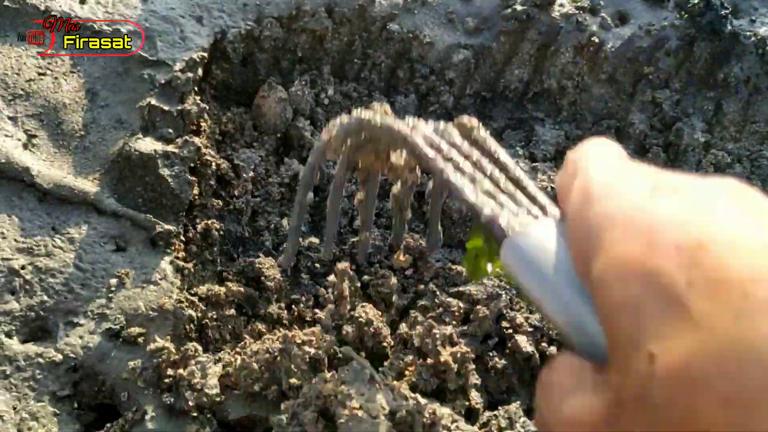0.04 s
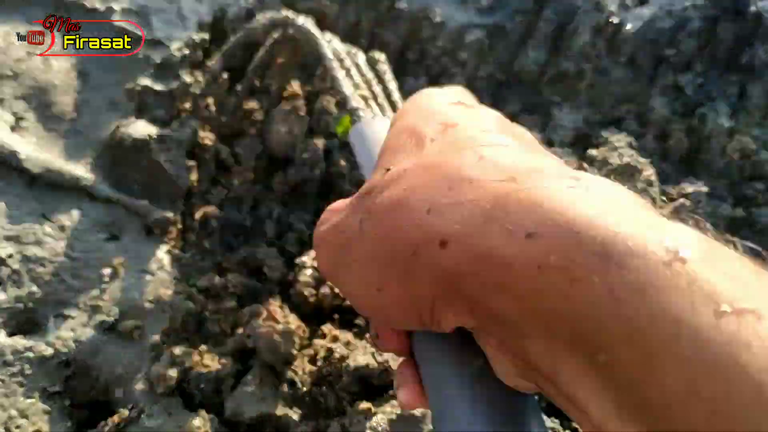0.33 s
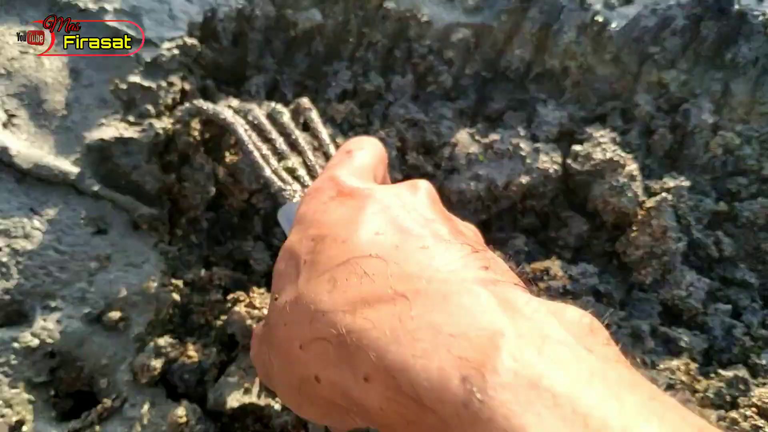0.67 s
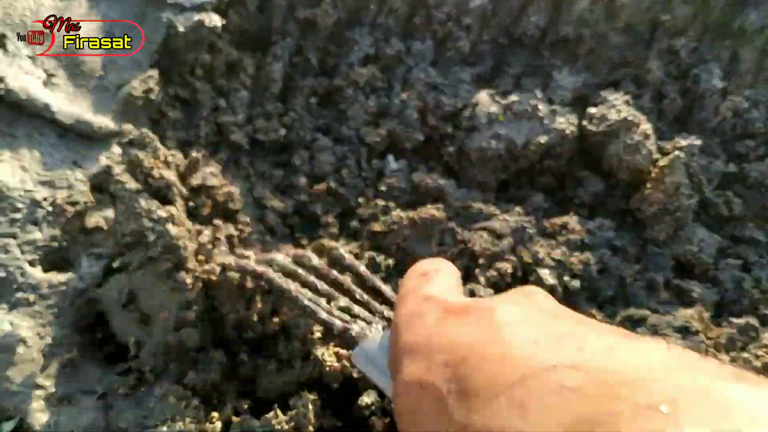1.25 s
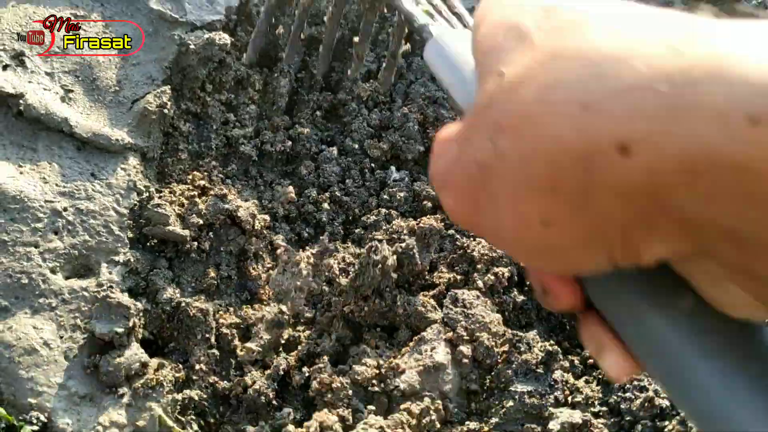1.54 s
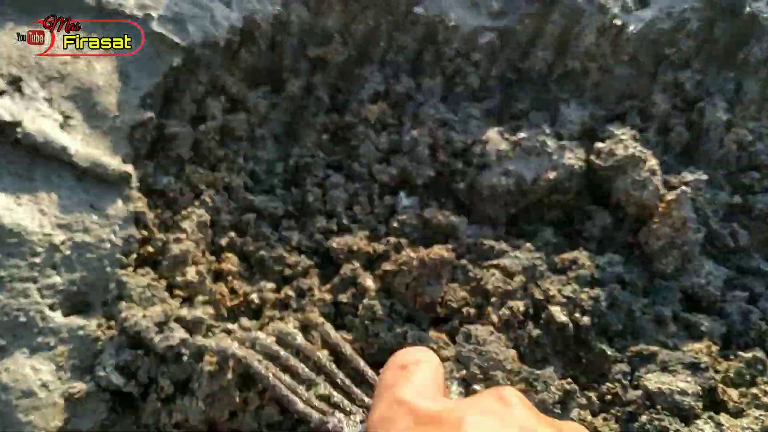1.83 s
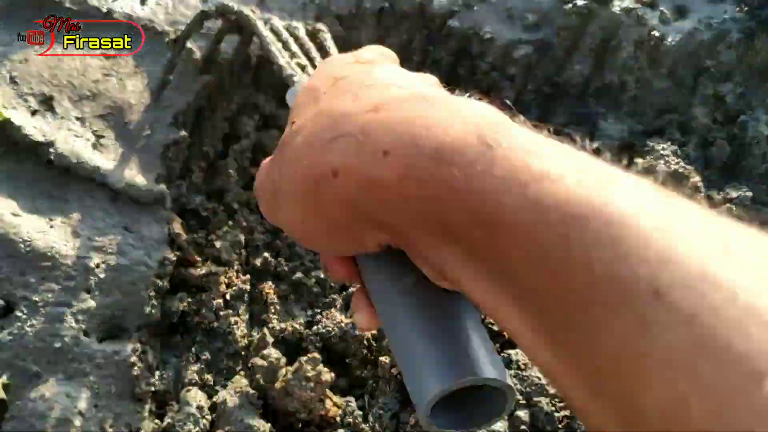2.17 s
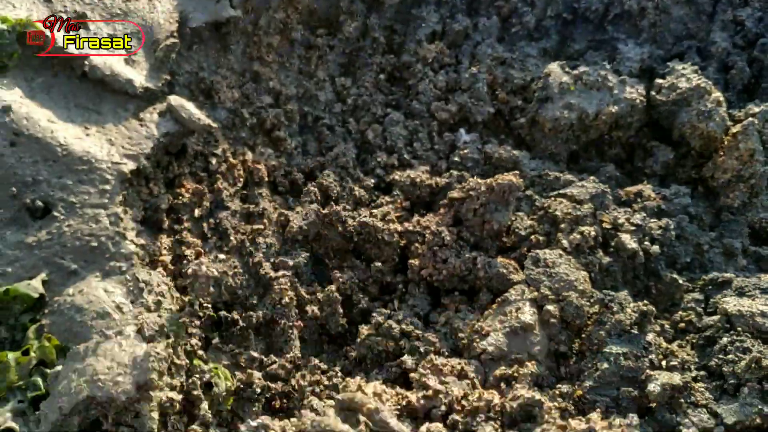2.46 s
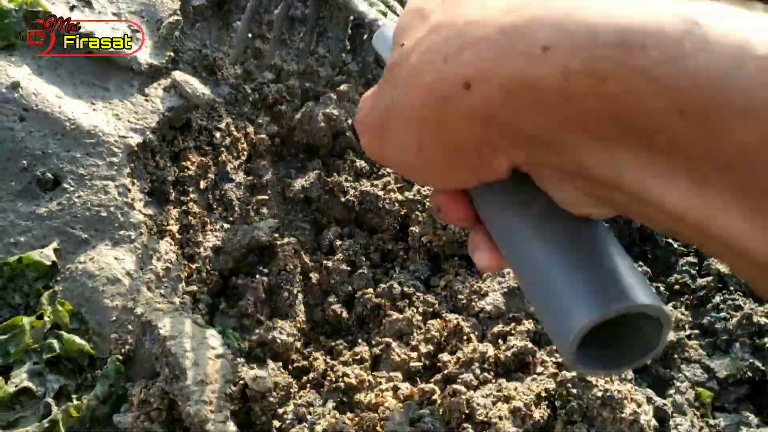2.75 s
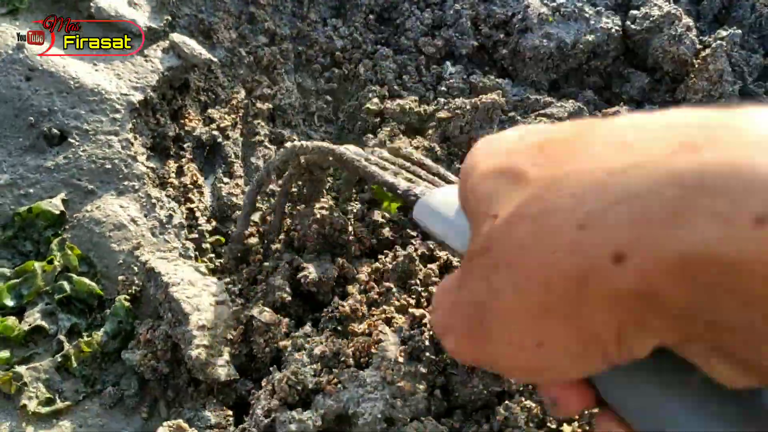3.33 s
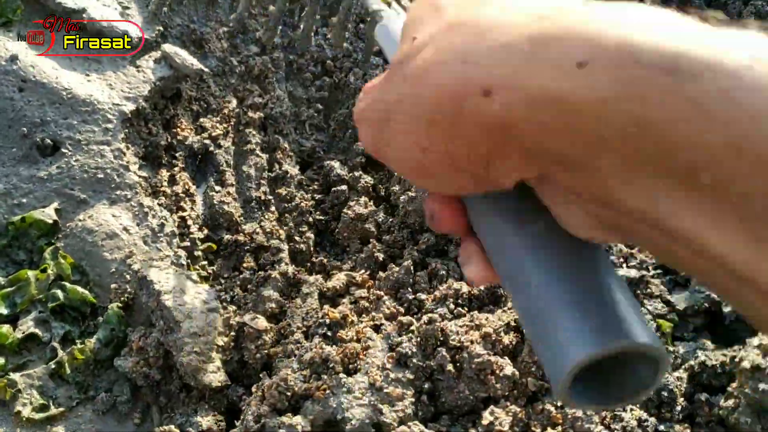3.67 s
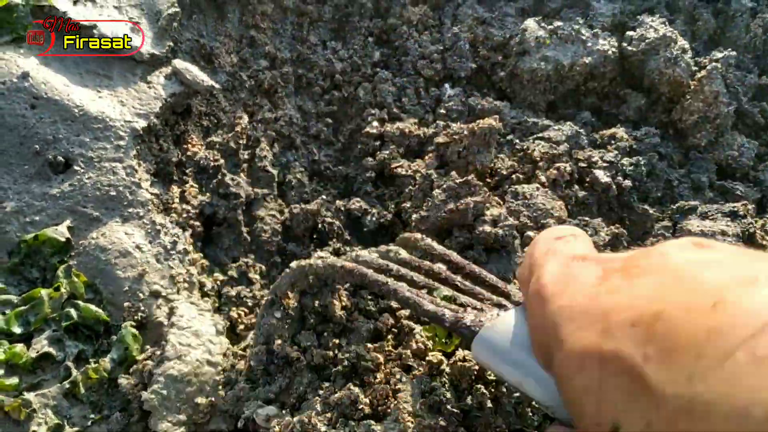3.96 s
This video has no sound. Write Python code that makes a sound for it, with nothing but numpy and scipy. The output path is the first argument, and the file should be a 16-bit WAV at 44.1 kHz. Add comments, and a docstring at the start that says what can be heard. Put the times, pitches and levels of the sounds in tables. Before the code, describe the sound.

A small hand rake scrapes through wet sand close up, eight gritty pulls about half a second apart, loudest from 0.7 to 2 seconds. Crumbs trickle between strokes, and the tines click on shell bits around 1.9, 2.4 and 2.9 seconds. A soft, dull plop comes at 3.3 seconds. Throughout, wind rumbles and thumps on the microphone, mostly on the left, over a faint shore hiss.

```python
"""Eight gritty pulls of a small hand rake through lumpy wet sand, close up, on an open shore.
The tines bite, drag, ring and knock on shell bits; loosened crumbs trickle down between pulls.
A breeze buffets the microphone, mostly its left port, and now and then overloads it.
Behind are the even hiss of the shore, one dull plop and a faint far whistle."""
import sys
import numpy as np
from scipy import signal
from scipy.fft import rfft, irfft
from scipy.io import wavfile
from scipy.ndimage import uniform_filter1d

SR = 44100
rng = np.random.default_rng(int(sys.argv[2]) if len(sys.argv) > 2 else 0)


def unload_audio(sound):
    """Save the sound as a 16-bit wav file, at the path given as the first command line argument."""
    columns = np.transpose(np.atleast_2d(sound))
    # keep every value between -1 and 1, then stretch to whole-number steps
    steps = np.round(np.clip(columns, -1, 1) * 32767)
    wavfile.write(sys.argv[1], SR, steps.astype(np.int16))


N = 176400
T = np.arange(N) / SR

# rake pulls: start_s, length_s, first_db, last_db, release_s, rasp_db
PULLS = [(-.15, 0.15, -19, -16.5, 0.004, 9.5), (0.333, 0.059, -16.5, -21, 0.02, 2),
         (0.701, 0.13, -12.5, -14, 0.026, 3.5), (1.21, 0.12, -13.5, -12.5, 0.036, 6.5),
         (1.785, .15, -11.5, -12.5, 0.029, 6), (2.311, 0.15, -17, -14, 0.033, 2.5),
         (2.883, 0.12, -16.5, -18.5, 0.034, -0.5), (3.353, 0.033, -18.5, -17, 0.043, -23),
         (3.864, 0.085, -17, -14, 0.043, -5)]
# tines biting in or breaking a clod: middle_s, half_length_s, level_db
BITES = [(0.267, 0.0025, -26.5), (.284, 0.0094, -17.5), (.663, 0.0053, -15), (0.798, 0.0064, -10.5),
         (1.165, 0.0066, -16), (1.314, 0.012, -15), (1.737, 0.0053, -12.5), (2.27, 0.0089, -21),
         (2.785, 0.011, -35.5), (2.869, .005, -18), (3.326, 0.0072, -19), (3.509, 0.0076, -27.5),
         (3.804, 0.0027, -14.5), (3.816, 0.0036, -14.5)]
# tines hitting shell bits and pebbles: start_s, level_db
KNOCKS = [(1.911, -2), (2.329, -1.5), (2.333, 6), (2.384, 3.5), (2.401, -5), (2.4229, 9), (2.466, -4),
          (2.945, 5)]
# sand scraping on the tines: freq_hz, level_db
SCRAPE_SPECTRUM = [(200, -40), (700, -30), (1350, -42), (1750, -12), (2050, 0), (3300, -7), (4500, -1),
                   (5500, 6.5), (6800, 0.5), (9000, 6), (11000, 0.5), (14200, -4.5)]
# packed sand giving way: freq_hz, level_db
RASP_SPECTRUM = [(1700, -29.5), (2100, 5.5), (4000, 3), (6500, -9.5)]
# clods crumbling: freq_hz, level_db
CLOD_SPECTRUM = [(150, 5.5), (1350, -5.5), (2300, -2.5), (5000, -49)]

def rake(pull_db=-7.5, bite_db=-4.5, knock_db=-14.5, rasp_db=-12, clod_db=-19, ping_db=-17, ping_hz=9000):
    """Tines crush grains: a crunch going in, a rasping drag, hard knocks that set a tine pinging."""
    drag = rasping = 0
    for start, length, first_db, last_db, release, pull_rasp_db in PULLS:
        level_db = np.interp(T, [start, start + length], [first_db, last_db])
        pull = from_db(level_db) * held(start, length, attack_s=0.022, release_s=release)
        drag += pull
        rasping += from_db(pull_db + rasp_db + pull_rasp_db) * pull
    bites = sum(from_db(db) * swell(middle, half) for middle, half, db in BITES)
    knocks = sum(from_db(db) * held(start, 0, attack_s=0.0013, release_s=0.004) for start, db in KNOCKS)
    impacts = from_db(bite_db) * bites + from_db(knock_db) * knocks
    force = from_db(pull_db) * drag * grains(per_s=9000, spread_db=0, clump_db=-1, clump_hz=130)
    force += impacts * grains(per_s=20000, spread_db=1.5, clump_db=-0.5, clump_hz=333)
    scrape = coloured(force, SCRAPE_SPECTRUM)
    rasp = coloured(rasping * grains(per_s=2500, spread_db=3.5, clump_db=-1.5, clump_hz=90), RASP_SPECTRUM)
    ping = from_db(ping_db) * knocks * np.sin(2 * np.pi * ping_hz * T)
    clods = from_db(clod_db) * coloured(force.sum(axis=0), CLOD_SPECTRUM)
    return scrape + rasp + drag * snaps() + tines(force) + ping + clods


# tine modes, damped by sand: pitch_hz, width_hz, level_db
TINE_MODES = [(2137, 150, -13), (2840, 73, -18.5), (3564, 57, -22.5), (4266, 70, -20), (5340, 250, -13.5)]

def tines(force, glide=0.036, waver_db=11.5, waver_hz=4):
    """Each mode glides and rings more or less freely as sand packs round the tines and falls away."""
    ringing = 0
    for hz, width_hz, db in TINE_MODES:
        pitch_hz = hz * (1 + glide * drift(waver_hz))
        phasor = np.exp(2j * np.pi * np.cumsum(pitch_hz) / SR)
        pole = np.exp(-np.pi * width_hz / SR)
        ring = (phasor * signal.lfilter([1], [1, -pole], force / phasor)).real
        freedom = from_db(waver_db * np.clip(drift(waver_hz), -2, 1))
        ringing += from_db(db) * unit_rms(ring) * unit_rms(freedom)
    return np.std(force) * ringing


def snaps(per_s=130, q=30, level_db=-17, pitches=24):
    """Coarse grains crack one by one, each ringing briefly at its own pitch."""
    cracks = (rng.random(N) < per_s / SR) * rng.standard_normal((2, N))
    pitch_index = rng.integers(0, pitches, N)
    rings = sum(resonate(cracks * (pitch_index == k) + 1e-18, hz, q)
                for k, hz in enumerate(np.geomspace(2300, 11000, pitches)))
    return from_db(level_db) * unit_rms(rings)


# crumbs trickling: start_s, length_s, level_db, fade_db_per_s
TRICKLES = [(0, 0.44, -23, 91), (0.812, 0.303, -36.5, 13), (1.361, 0.38, -21, 66), (1.945, 0.25, -27, 59),
            (2.497, 0.26, -23.5, 66), (3.473, 0.05, -38, 16)]
# flung grit landing: start_s, level_db
TICKS = [(0.104, -17.5), (0.611, -29.5), (.954, -27), (1.608, -21), (2.136, -23), (2.197, -21),
         (2.834, -30), (3.029, -29), (3.04, -14), (3.06, -13.5)]
# falling sand: freq_hz, level_db
CRUMB_SPECTRUM = [(300, -8), (1400, -3), (2200, 1), (3300, 0.5), (5300, 2.5), (7000, 5), (10000, 2.5),
                  (14200, 0.5)]

def crumbs(trickle_db=-7, tick_db=-13, edge_s=0.0018):
    """Loosened sand patters down, ever fainter; larger bits land with a tick."""
    fall = sum(from_db(db - fade * np.clip(T - start, 0, length)) * held(start, length, edge_s, edge_s)
               for start, length, db, fade in TRICKLES)
    landings = sum(from_db(db) * held(start, 0, attack_s=0.0027, release_s=0.0039) for start, db in TICKS)
    patter = from_db(trickle_db) * fall * grains(per_s=10000, spread_db=0, clump_db=1.5, clump_hz=88)
    ticks = from_db(tick_db) * landings * rng.standard_normal((2, N))
    return coloured(patter + ticks, CRUMB_SPECTRUM)


def grains(per_s, spread_db, clump_db, clump_hz, correlation=0.089):
    """Grains click in clumps; each reaches the two ports with partly different strength."""
    clicks = rng.random(N) < per_s / SR
    sizes = from_db(spread_db * np.minimum(rng.exponential(1, N), 4))
    shared, own = rng.standard_normal(N), rng.standard_normal((2, N))
    strength = np.sqrt(correlation) * shared + np.sqrt(1 - correlation) * own
    clumps = from_db(clump_db * np.clip(drift(clump_hz), -2, 2))
    return unit_rms(clicks * sizes * clumps * strength)


def clump_colours(sand, depth_db=4.5, rate_hz=9, base_hz=1800, bands_per_octave=13):
    """Each clump of grains has its own colour: narrow bands swell and fade separately."""
    freq_hz = np.arange(N // 2 + 1) * SR / N
    band_position = np.log2(np.maximum(freq_hz / base_hz, 1)) * bands_per_octave
    spectrum = rfft(sand)
    mix = 0
    for k in range(42):
        band = irfft(spectrum * np.maximum(1 - abs(band_position - k), 0), N)
        mix += band * unit_rms(from_db(depth_db * np.minimum(drift(rate_hz), 1)))
    return mix


# breeze strength: time_s, level_db, left_minus_right_db
BREEZE = [(0.0, -21, -7), (0.1, -15.5, 7), (0.73, -20, 14), (0.98, -26.5, 4), (1.058, -20, 27),
          (1.6, -19.5, 17), (2.67, -21, 15), (2.72, -17, 29), (2.8, -32.5, -7.5), (2.85, -20.5, 21),
          (3.84, -17.5, 19), (3.951, -19.5, 32), (4.0, -27, 12)]
# eddies striking the microphone: middle_s, half_length_s, level_db
EDDIES = [(0.186, 0.0088, -9.5), (0.252, 0.0072, -5), (0.312, 0.018, -11.5), (.535, 0.018, -10),
          (0.619, 0.0055, -7.5), (0.743, 0.012, -7), (0.81, 0.0082, -11), (0.872, 0.0069, -7.5),
          (1.046, 0.013, -12), (1.107, 0.012, -5.5), (1.154, 0.0057, -11.5), (1.217, 0.021, -13.5),
          (1.38, 0.0047, -6.5), (1.479, 0.0078, -9), (1.575, 0.013, -9), (1.623, 0.0086, -9),
          (1.667, 0.012, -12), (1.704, 0.0092, -5), (1.779, 0.0052, -9.5), (1.824, 0.011, -10.5),
          (2.015, 0.0046, -11.5), (2.132, 0.0095, -14.5), (2.212, 0.0046, -7), (2.259, 0.0082, -8),
          (2.614, 0.013, -15.5), (2.705, 0.0049, -9), (2.873, 0.0064, -10.5), (3.018, 0.0046, -13.5),
          (3.368, 0.012, -8.5), (3.642, 0.0049, -12.5), (3.702, 0.0057, -16), (3.94, 0.0062, -8.5)]
# wind rumble: freq_hz, level_db
RUMBLE_SPECTRUM = [(8, -11), (22, 2), (40, -.5), (80, -8), (160, -14.5), (300, -29), (600, -48),
                   (3000, -111)]
# eddy flutter: freq_hz, level_db
EDDY_SPECTRUM = [(15, -7), (60, 5), (150, -2), (250, -9.5), (400, -15.5), (700, -28.5), (1300, -48.5),
                 (3000, -63.5)]

def wind(rumble_db=5, gust_db=3, gust_hz=22, push_db=13.5, push_share=0.49, leak_hz=26):
    """Air rumbles at each port; eddies add flutter and push on the left. The right is mostly sheltered."""
    times, breeze_db, shelter_db = np.transpose(BREEZE)
    strength = from_db(rumble_db + np.interp(T, times, breeze_db) + gust_db * drift(gust_hz))
    rumble = strength * turbulence(RUMBLE_SPECTRUM, levelling_hz=18.4)
    strikes = sum(from_db(db) * swell(middle, half) for middle, half, db in EDDIES)
    pushes = sum(from_db(push_db + db) * swell(middle, half * push_share) for middle, half, db in EDDIES)
    left, right = rumble + strikes * turbulence(EDDY_SPECTRUM, levelling_hz=116)
    left += signal.lfilter(*signal.butter(1, leak_hz, "high", fs=SR), pushes)
    right *= from_db(-np.interp(T, times, shelter_db))
    return np.array([left, right])


def turbulence(spectrum, levelling_hz):
    """Coloured stereo noise with its slower level swings evened out."""
    noise = coloured(rng.standard_normal((2, N)), spectrum)
    power = abs(signal.hilbert(noise)) ** 2 / 2
    return noise / np.sqrt(uniform_filter1d(power, int(SR / levelling_hz)))


# hollow thuds of air: start_s, level_db, pitch_hz
THUDS = [(0.048, -0.5, 161), (0.519, -6.5, 190), (1.031, -1.5, 204), (1.255, 0.5, 154), (1.563, -8.5, 229),
         (2.102, -4, 225), (2.692, -4.5, 108), (3.133, -5, 141), (3.236, -3.5, 130), (3.926, -1.5, 99)]

def thuds(attack_s=0.0012, decay_s=0.009, right_db=-24):
    """Jolts of air at the left port die within a few cycles."""
    jolts = sum(from_db(db) * held(start, 0, attack_s, decay_s) * np.sin(2 * np.pi * hz * (T - start))
                for start, db, hz in THUDS)
    return jolts * from_db([[0], [right_db]])


# dull plop: freq_hz, level_db
PLOP_SPECTRUM = [(120, -17), (400, 15), (900, -15.5), (3000, -23.5), (12000, -48)]

def plop(start_s=3.272, level_db=-22.5):
    """One soft, dull plop, toward the right."""
    burst = held(start_s, 0, attack_s=0.0013, release_s=0.018) * rng.standard_normal(N)
    return from_db(level_db) * coloured(burst, PLOP_SPECTRUM) * np.array([[0.5], [1]])


# shore hiss: freq_hz, level_db
SHORE_SPECTRUM = [(200, 40.8), (900, 17), (1700, 14.7), (3000, 10.1), (6000, 9), (10000, 8.4), (14200, 8.5)]

def shore(level_db=-41.5):
    """Faint, even hiss of the open shore."""
    return from_db(level_db) * coloured(rng.standard_normal((2, N)), SHORE_SPECTRUM)


# far whistle: start_s, length_s, first_hz, last_hz, level_db
WHISTLES = [(3.056, 0.14, 1100, 1770, -60)]

def whistle(waver_hz=30):
    """A faint, wavering tone glides upward."""
    waver = waver_hz * drift(rate_hz=75)
    tone = 0
    for start, length, first_hz, last_hz, db in WHISTLES:
        pitch_hz = np.interp(T, [start, start + length], [first_hz, last_hz]) + waver
        envelope = from_db(db) * held(start, length, attack_s=0.011, release_s=0.03)
        tone += envelope * np.sin(2 * np.pi * np.cumsum(pitch_hz) / SR)
    return tone


def from_db(db):
    """Decibels to gain."""
    return 10 ** (np.asarray(db) / 20)


def unit_rms(x):
    """Scale to unit power."""
    return x / np.sqrt(np.mean(x ** 2) + 1e-20)


def drift(rate_hz):
    """Smooth random wander of unit power, computed at a tenth of the sample rate."""
    pole = np.exp(-20 * np.pi * rate_hz / SR)
    slow = signal.lfilter([1], [1, -2 * pole, pole * pole], rng.standard_normal(N // 10 + 4002))[4000:]
    return np.interp(np.arange(N) / 10, np.arange(len(slow)), unit_rms(slow))


def coloured(x, spectrum):
    """Minimum-phase filter with the given spectrum and unit power gain."""
    size = 2 * N
    hz, db = np.transpose(spectrum)
    bin_hz = np.arange(N + 1) * SR / size
    gain = unit_rms(from_db(np.interp(np.log(bin_hz + 1), np.log(hz), db)))
    cepstrum = irfft(np.log(gain))
    cepstrum[1:N] *= 2
    cepstrum[N + 1:] = 0
    return irfft(rfft(x, size) * np.exp(rfft(cepstrum)), size)[..., :N]


def resonate(x, hz, q):
    """One resonance with unit peak gain."""
    return signal.lfilter(*signal.iirpeak(hz, q, fs=SR), x)


def swell(middle_s, half_length_s):
    """Bell-shaped rise and fall."""
    return np.exp(-0.5 * np.minimum(((T - middle_s) / half_length_s) ** 2, 60))


def held(start_s, length_s, attack_s, release_s):
    """Bell-shaped rise up to start_s, hold, exponential fall."""
    rise = (np.maximum(start_s - T, 0) / attack_s) ** 2
    fall = np.maximum(T - start_s - length_s, 0) / release_s
    return np.exp(-np.minimum(rise + fall, 30))


def scene(pan_db=3, left_lag_s=0.00008):
    """All sources in open air; sand and shore are louder and slightly later at the left port."""
    sand = clump_colours(rake() + crumbs())
    left, right = (sand + shore()) * from_db([[pan_db / 2], [-pan_db / 2]])
    left = np.interp(T - left_lag_s, T, left)
    return np.array([left, right]) + plop() + whistle() + wind() + thuds()


# microphone port resonances, left then right: pitch_hz, width_hz, boost_db
PORTS = [(9824, 450, 18), (8540, 830, 13)]

def record(dry, cutoff_hz=14300):
    """Each port rings in the high treble; peaks overload; the top is cut."""
    heard = np.array([x + (from_db(boost_db) - 1) * resonate(x, hz, hz / width_hz)
                      for x, (hz, width_hz, boost_db) in zip(dry, PORTS)])
    low_pass = signal.ellip(10, 0.1, 70, cutoff_hz, fs=SR, output="sos")
    return signal.sosfilt(low_pass, np.clip(heard, -1, 1))


dry = scene()
out = record(dry)
unload_audio(out)
```